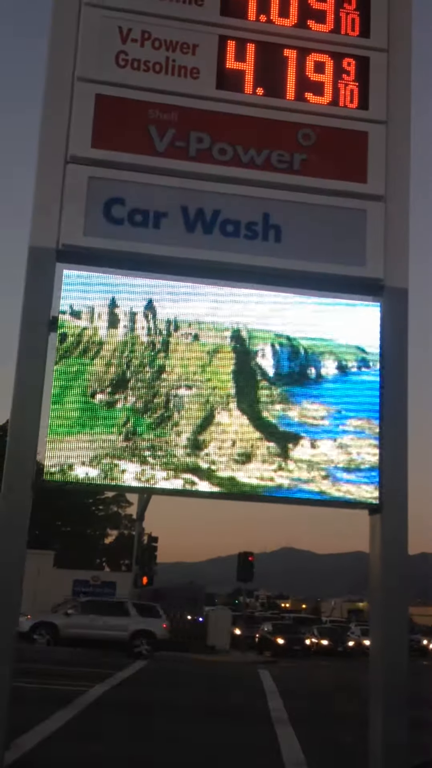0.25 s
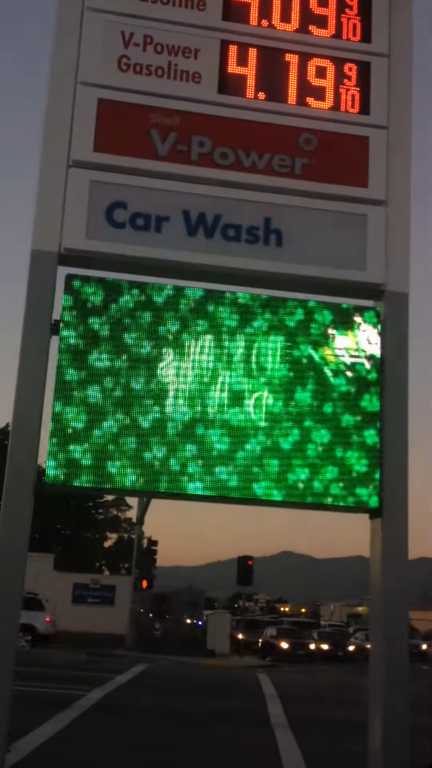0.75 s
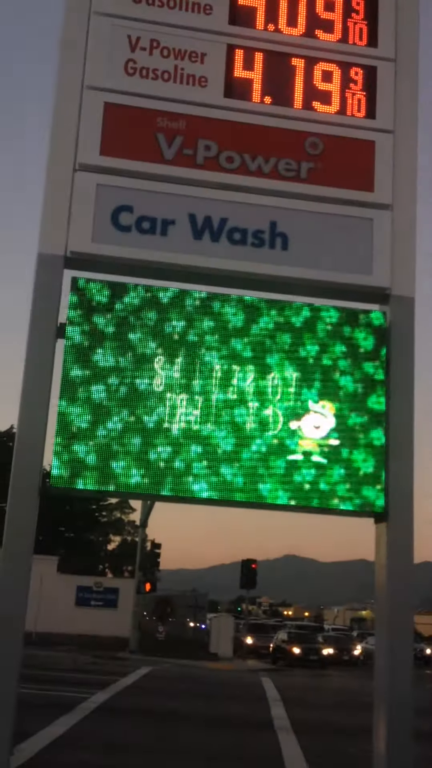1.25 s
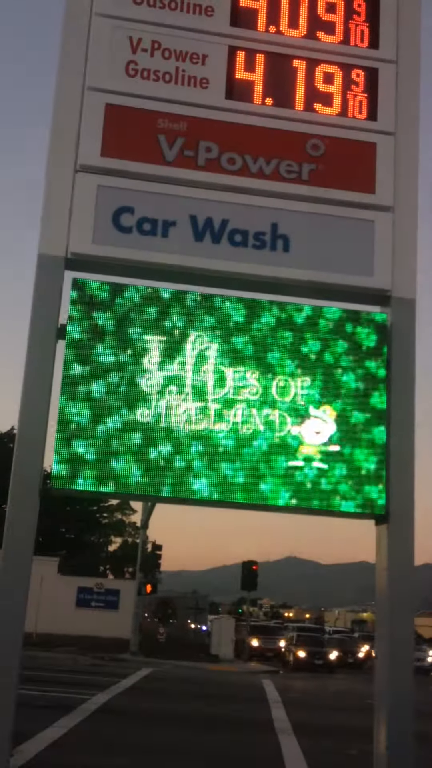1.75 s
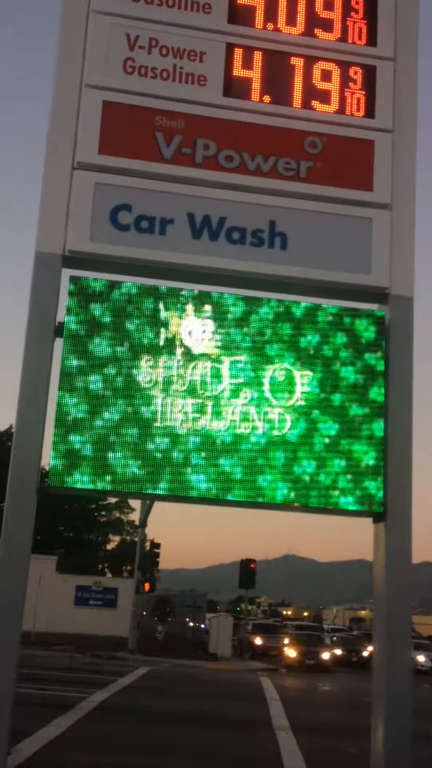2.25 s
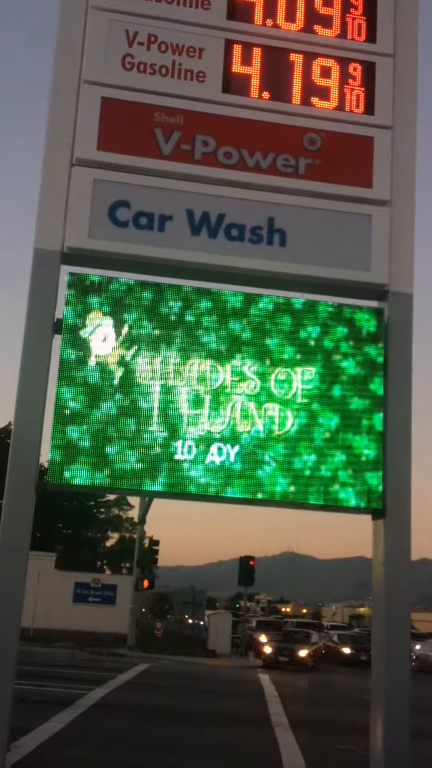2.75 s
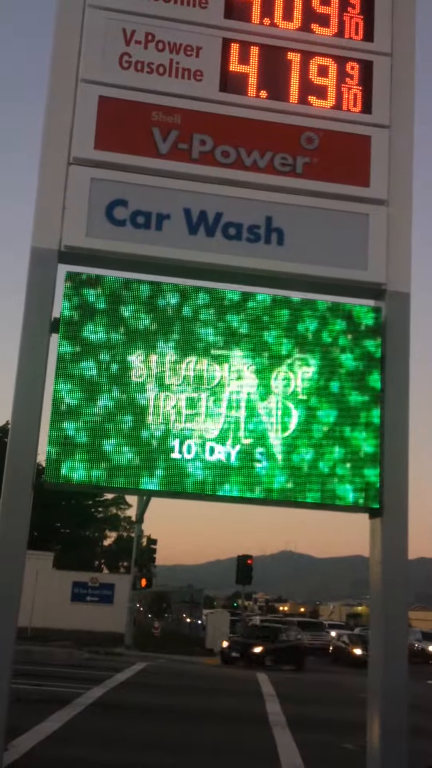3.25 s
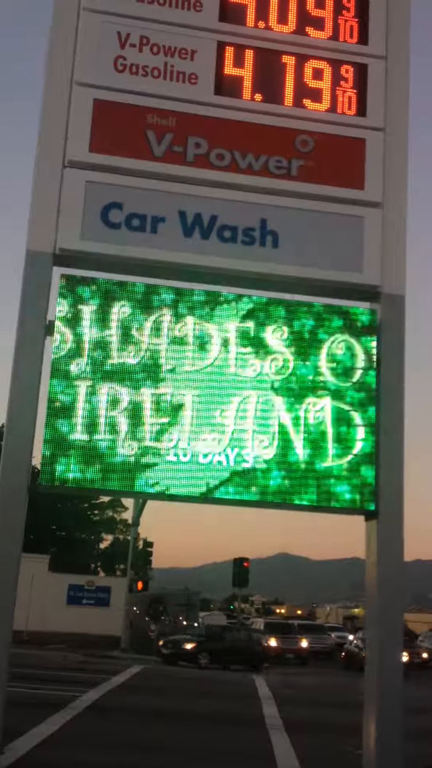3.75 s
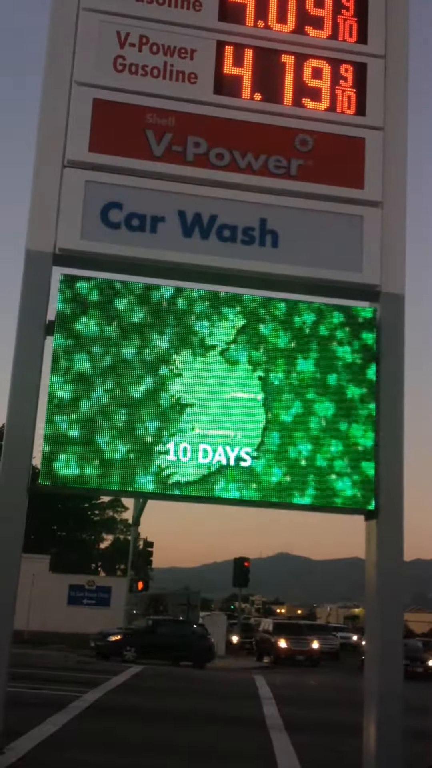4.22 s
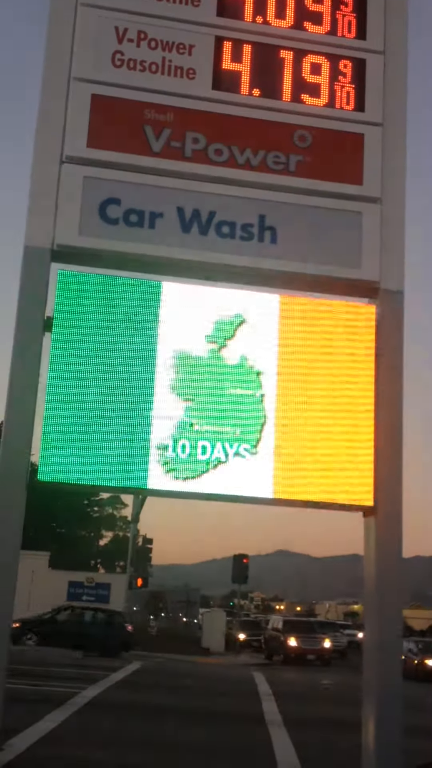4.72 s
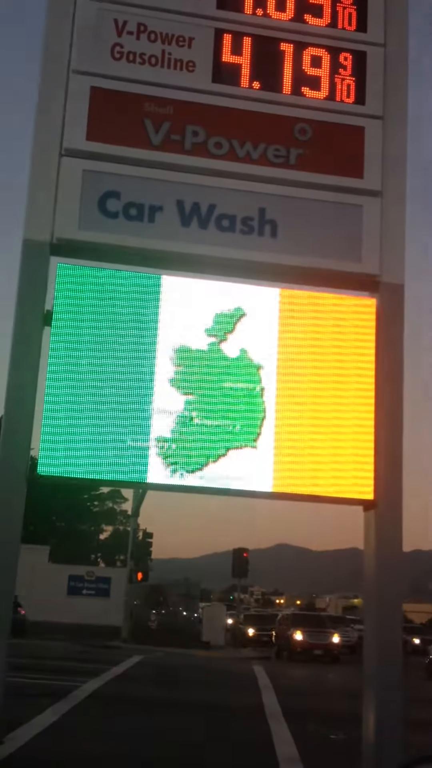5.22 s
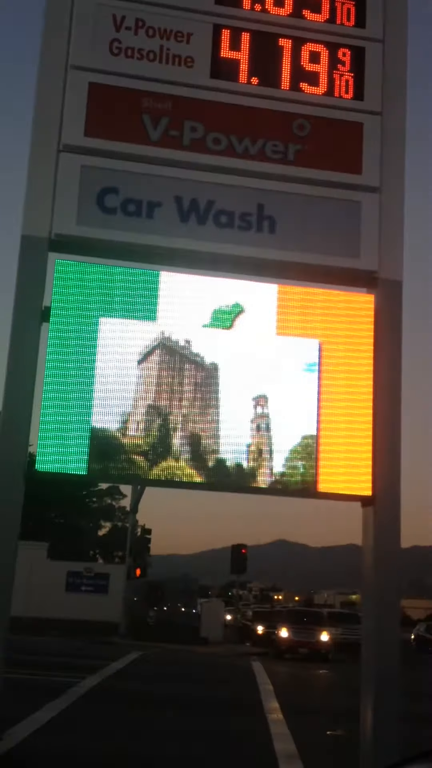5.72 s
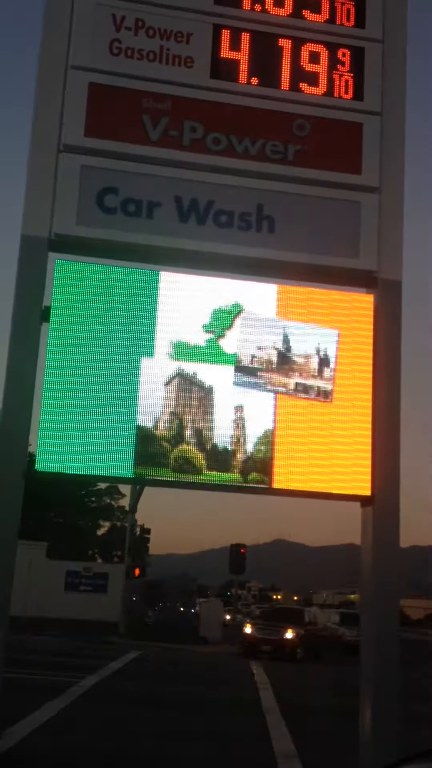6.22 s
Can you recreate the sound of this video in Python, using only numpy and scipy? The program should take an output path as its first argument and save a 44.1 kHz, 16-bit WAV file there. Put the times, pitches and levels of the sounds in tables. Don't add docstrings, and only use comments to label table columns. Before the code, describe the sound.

A fixed microphone at a street crossing picks up faint traffic rumble and its own steady hiss. A heavy motorcycle pulls away from the lights: rough, hesitant beats at first, then loud round thuds with crackling edges and a humming pipe drone. It revs up, eases off for a gear change, pops softly, pulls again, slackens briefly and picks up at the end, with short street echoes.

```python
import sys
import numpy as np
from scipy import signal
from scipy.fft import rfft, irfft, next_fast_len
from scipy.io import wavfile
from scipy.ndimage import uniform_filter1d

SR = 44100
rng = np.random.default_rng(int(sys.argv[2]) if len(sys.argv) > 2 else 0)


def wav_record(signal):
    frames = np.transpose(np.atleast_2d(signal))
    bounded = np.clip(frames, -1, 1)
    quanta = np.round(bounded * 32767).astype(np.int16)
    wavfile.write(sys.argv[1], SR, quanta)


def amplitude_ratio(level_db):
    exponent = np.asarray(level_db, float) / 20
    return 10 ** exponent


N = 285768
REAR_FIRES_AT = 300 / 720
CRACK_LAG_S = 0.0017


def in_time(rows):
    s, *columns = np.transpose(rows)
    return [np.interp(np.arange(N) / SR, s, column) for column in columns]


def rms_one(x):
    return x / np.sqrt(np.mean(x ** 2) + 1e-20)


def evened(x):
    power = uniform_filter1d(uniform_filter1d(x ** 2, size=6000), size=6000)
    return x / np.sqrt(power + 1e-12)


def shaped_noise(spectrum):
    hz, db = np.transpose(spectrum)
    grid = np.fft.rfftfreq(N, 1 / SR) + 1
    gain = amplitude_ratio(np.interp(np.log(grid), np.log(hz), db))
    return rms_one(irfft(rfft(rng.standard_normal(N)) * gain, N))


def drift(rate):
    r = np.exp(-80 * np.pi * rate / SR)
    slow = signal.lfilter([1], [1, -2 * r, r * r], rng.standard_normal(N // 40 + 2002))[2000:]
    return np.interp(np.arange(N) / 40, np.arange(len(slow)), rms_one(slow))


def resonance(x, hz, width):
    r = np.exp(-np.pi * width / SR)
    poles = [1, -2 * r * np.cos(2 * np.pi * hz / SR), r * r]
    return signal.lfilter([(1 - r * r) / 2, 0, (r * r - 1) / 2], poles, x + 1e-18)


def butter(x, kind, hz, order):
    return signal.sosfilt(signal.butter(order, hz, kind, fs=SR, output="sos"), x)


def later(x, seconds):
    lag = int(seconds * SR)
    return np.concatenate([np.zeros(lag), x[:N - lag]])


def street(x):
    t60_s, cut_hz = 0.12, 1200
    size = next_fast_len(N + SR)
    turn = -2j * np.pi * np.fft.rfftfreq(size, 1 / SR)
    echoes = 0
    for k, lag in enumerate(rng.uniform(0.02, 0.07, 8)):
        loop = amplitude_ratio(-60 * lag / t60_s) * np.exp(turn * lag)
        echoes = echoes + (-1) ** k * loop / (1 - loop)
    wet = butter(irfft(rfft(x, size) * echoes, size)[:N], "low", cut_hz, order=1)
    return wet * np.std(x) / np.std(wet)


# frequency in Hz, level in dB.
TRAFFIC_SPECTRUM = [(25, -38.5), (89, -6), (145, 1.5), (287, -12.5), (456, -26.5), (900, -27.5),
                    (1400, -37.5), (5500, -64.5)]


def traffic():
    hum = shaped_noise(TRAFFIC_SPECTRUM)
    low = butter(hum, "low", 330, order=2)
    high = hum - low
    return amplitude_ratio(-53.5) * (low * amplitude_ratio(0.8 * drift(3)) + high * amplitude_ratio(0.8 * drift(2.5)))


# frequency in Hz, level in dB per Hz.
HISS_SPECTRUM = [(880, -24.5), (1500, -5), (2030, -0.5), (2710, -2), (4230, -2.5), (9550, -13), (14600, -7),
                 (15200, -5.5)]


def hiss():
    return amplitude_ratio(-75.5) * shaped_noise(HISS_SPECTRUM)


# time in seconds, engine cycles (two crank turns) per second.
ENGINE_SPEED = [(0.0, 13.09), (1.06, 15.43), (1.4, 20.49), (1.54, 21.04), (2.09, 19.63), (2.3, 18.51),
                (2.47, 20.45), (2.86, 25.67), (3.31, 30.84), (3.52, 31.79), (3.61, 31.11), (4.21, 21.21),
                (4.41, 22.32), (5.24, 25.67), (5.97, 26.88), (6.23, 27.97), (6.48, 30.19)]


def engine_speed():
    speed, = in_time(ENGINE_SPEED)
    return speed, uniform_filter1d(np.gradient(speed) * SR, size=4000)


# start in seconds, end in seconds, depth from 0 to 1.
THROTTLE_EASED = [
    (0.694, 1.3, 0.9),
    (3.512, 4.179, 1),
    (5.416, 6.183, 1),
]


def throttle_shut():
    t, travel_s = np.arange(N) / SR, 0.14
    return sum(depth * np.clip(np.minimum(t - start, end - t) / travel_s + 0.5, 0, 1)
               for start, end, depth in THROTTLE_EASED)


def by_throttle(shut, loaded, eased):
    return np.interp(shut, (0, 1), (loaded, eased))


def firings(cycle, offset, rough):
    at = np.searchsorted(cycle, np.arange(1, int(cycle[-1])) + offset)
    chance = rng.standard_normal((len(at), 2)) * rough[at, None]
    shift = (0.004 * SR * chance[:, 0]).astype(int)
    clicks = np.zeros(N)
    clicks[np.clip(at + shift, 0, N - 1)] = amplitude_ratio(12 * chance[:, 1])
    return clicks


def thud(front, rear, return_db, ring_db, boom_db, overtone_db, shoulder_db):
    # Hz, width in Hz
    boom, front_ring = (67, 200), (242.4, 42)
    shoulder, overtone = (266, 44), (356.5, 68)
    silencer_hz, silencer_dip = 278.2, (317.4, 114)
    front, rear = (x + amplitude_ratio(return_db) * later(x, 0.009487) for x in (front, rear))
    both = front + rear
    wave = resonance(both, 195, 150)
    wave = wave + amplitude_ratio(ring_db) * resonance(front, *front_ring)
    wave = wave + amplitude_ratio(boom_db) * resonance(both, *boom)
    wave = wave + amplitude_ratio(shoulder_db - 0.5) * resonance(both, *shoulder)
    wave = butter(wave, "low", silencer_hz, order=6)
    wave = butter(wave, "high", 112, order=4)
    wave = wave - resonance(wave, *silencer_dip)
    return wave + amplitude_ratio(overtone_db - 8.5) * resonance(resonance(both, *overtone), *overtone)


def damping(cycle, shut):
    still = (later(cycle, 0.012) % 1 > REAR_FIRES_AT) & (cycle % 1 > REAR_FIRES_AT)
    return amplitude_ratio(-3 * (1.5 - shut) * uniform_filter1d(still * 1., size=180))


# frequency in Hz, width in Hz, level in dB.
CRACK_RINGS = [
    (468, 201, 4.5),
    (699.5, 215, 2.5),
    (1353, 96, -10),
]


def crack(clicks, bark_db):
    bark, side_ring = (998, 143), (1290, 74)   # Hz, width in Hz
    front = later(clicks + amplitude_ratio(-4) * later(clicks, 0.002495), CRACK_LAG_S)
    outflow = signal.lfilter([1], [1, -np.exp(-1 / (0.006 * SR))], front)
    front = front + amplitude_ratio(-26) * outflow * rng.standard_normal(N)
    out = 0
    for k, (hz, width, db) in enumerate(CRACK_RINGS):
        out = out + (-1) ** k * amplitude_ratio(db) * resonance(front, hz, width)
    out = out + amplitude_ratio(bark_db - 2) * resonance(resonance(front, *bark), *bark)
    out = out + amplitude_ratio(-16 - bark_db) * resonance(resonance(front, *side_ring), *side_ring)
    return butter(butter(out, "high", 430, order=2), "low", 2500, order=2)


# time in seconds, drone level in dB.
DRONE_LEVEL = [(0.95, -49), (1.2, -40), (1.45, -39.5), (1.8, -46.5), (2.3, -51), (2.58, -38), (2.72, -44.5),
               (2.95, -34.5), (3.4, -35), (3.6, -38.5), (3.9, -43.5), (4.12, -46.5), (4.6, -43),
               (4.85, -38.5), (5.25, -44.5), (5.6, -55), (5.93, -43.5), (6.2, -52)]


def drone(cycle, speed, climb, shut, rough):
    def through_pipe(k, hz, width):
        return 1 / np.hypot(1, 2 * (k * speed - hz) / width)

    drone_db, = in_time(DRONE_LEVEL)
    angle = 2 * np.pi * later(cycle, CRACK_LAG_S + 0.0046)
    seventh_db = -6.5 + climb * np.where(climb < 0, 19, 0.55)
    fourth = through_pipe(4, 122, 25) * amplitude_ratio(by_throttle(shut, -15.5, -5.5))
    fifth = through_pipe(5, 139, 30.2)
    seventh = through_pipe(7, 138, 21) * amplitude_ratio(seventh_db)
    tones = fifth * np.cos(5 * angle) + seventh * np.cos(7 * angle) + fourth * np.cos(4 * angle + 2)
    return np.sqrt(2) * amplitude_ratio(drone_db) * tones * amplitude_ratio(14 * rough * drift(12))


def with_echo(x, echo_db):
    x = evened(x)
    return evened(x + amplitude_ratio(echo_db) * street(x))


# time in seconds, thud level in dB, crack level in dB above the thud.
RIDE_LEVELS = [(0.95, -78.5, -12.5), (1.1, -50.5, -16.5), (1.4, -47.5, -23.5), (1.7, -35.5, -42.5),
               (1.95, -38.5, -24.5), (2.2, -34, -27), (2.55, -37, -20), (2.78, -32.5, -21),
               (3.3, -35, -19.5), (3.6, -39.5, -25.5), (4.14, -45, -21.5), (4.26, -41, -21),
               (4.65, -42.5, -19), (5.3, -40, -21), (5.45, -44.5, -20), (5.9, -45.5, -22.5),
               (6.13, -46.5, -22), (6.3, -39, -22)]
# time in seconds, then overtone, bark and pipe return, all in dB.
PIPE_COLOUR = [(1.25, 4, -.6, 0.9), (1.7, -4, -1.3, 3.5), (2.1, 4, -0.2, 1.5), (2.45, -2.5, 3, -3),
               (2.75, .6, 2, 2), (3.3, 1.5, 1.5, -1.3), (3.65, 5.5, 0.5, 0.8), (4.3, -4.5, -2, 3),
               (4.6, -3, -5, 2), (4.85, -2, -0.2, 0), (5.4, 4, -3.5, -3), (5.9, 0.8, 5, -2),
               (6.3, -0.3, -1, -3.5)]


def motorcycle():
    thud_db, edge_db = in_time(RIDE_LEVELS)
    overtone_change_db, bark_change_db, return_change_db = in_time(PIPE_COLOUR)
    crack_db = thud_db + edge_db
    shut = throttle_shut()
    speed, climb = engine_speed()
    revs = speed - 24

    louder_db = crack_db + 53.5
    bark_db = 5.7 + 0.56 * louder_db + bark_change_db
    overtone_db = -1.1 + 0.27 * louder_db + overtone_change_db + 0.5 * np.maximum(climb, -4)

    rough = by_throttle(shut, 0.055, 0.24)
    rear_db = by_throttle(shut, -2, -3) - 0.26 * revs
    return_db = by_throttle(shut, -4, -5) + return_change_db - 0.67 * revs
    ring_db = by_throttle(shut, 8, -3.5) - 0.084 * revs
    boom_db = by_throttle(shut, -9.5, -5.5) + 0.44 * revs
    shoulder_db = 0.34 * revs

    cycle = np.cumsum(speed) / SR + CRACK_LAG_S * speed
    front = firings(cycle, 0, rough)
    rear = firings(cycle, REAR_FIRES_AT, rough)
    low = thud(front, amplitude_ratio(rear_db) * rear, return_db, ring_db, boom_db, overtone_db, shoulder_db)
    low = with_echo(damping(cycle, shut) * low, by_throttle(shut, -11, -4))
    high = crack(front + amplitude_ratio(by_throttle(shut, -3, -5)) * rear, bark_db)
    high = with_echo(high, by_throttle(shut, -6.5, 7))
    tones = drone(cycle, speed, climb, shut, rough)
    start = np.clip((np.arange(N) / SR - 0.85) / 0.2, 0, 1)
    return start * (amplitude_ratio(thud_db) * low + amplitude_ratio(crack_db) * high + tones)


# time in seconds, peak level in dB.
FUEL_POPS = [
    (3.215, -48),
    (3.736, -44.5),
    (3.92, -45),
]


def backfires():
    clicks = np.zeros(N)
    for s, db in FUEL_POPS:
        clicks[int(s * SR)] = amplitude_ratio(db + 39.5)
    pop = resonance(clicks, 460, 310) - resonance(clicks, 660, 400)
    pop = butter(pop, "low", 710, order=4)
    return pop + amplitude_ratio(-10) * street(pop)


def scene():
    return (traffic() + hiss() + motorcycle() + backfires())[None]


def low_pass(x):
    return signal.sosfilt(signal.butter(12, 15310, fs=SR, output="sos"), x)


def record(dry):
    return low_pass(dry)


dry = scene()
out = record(dry)
wav_record(out)
```